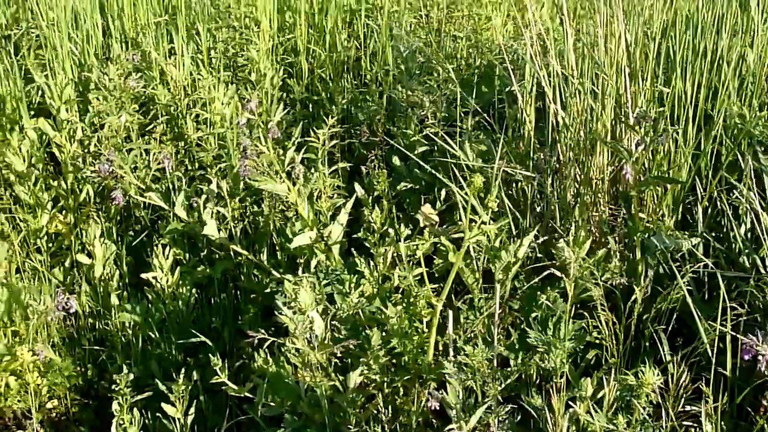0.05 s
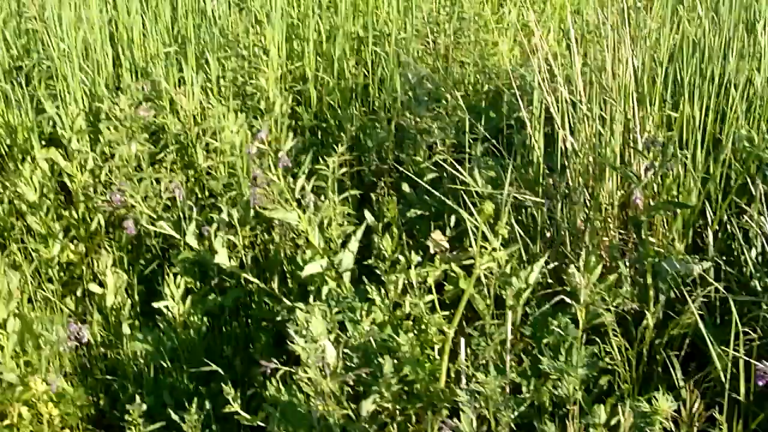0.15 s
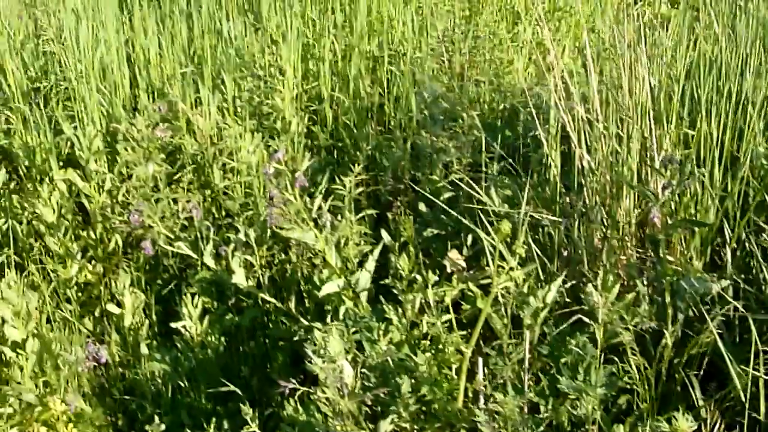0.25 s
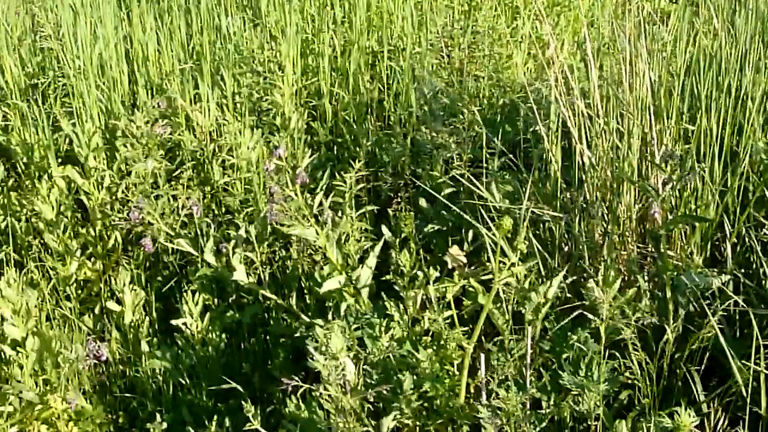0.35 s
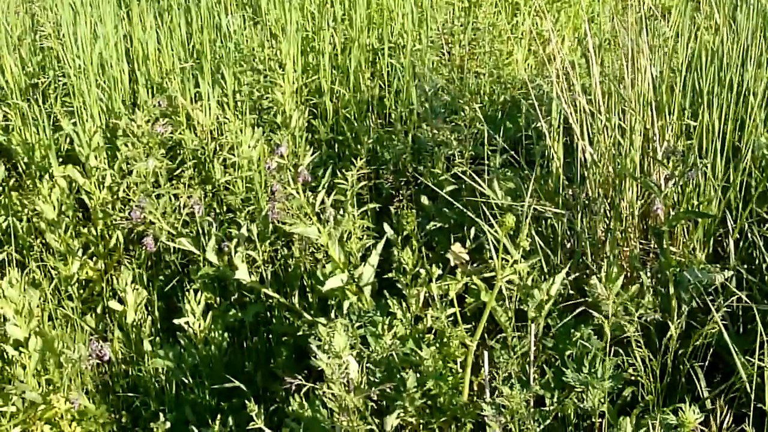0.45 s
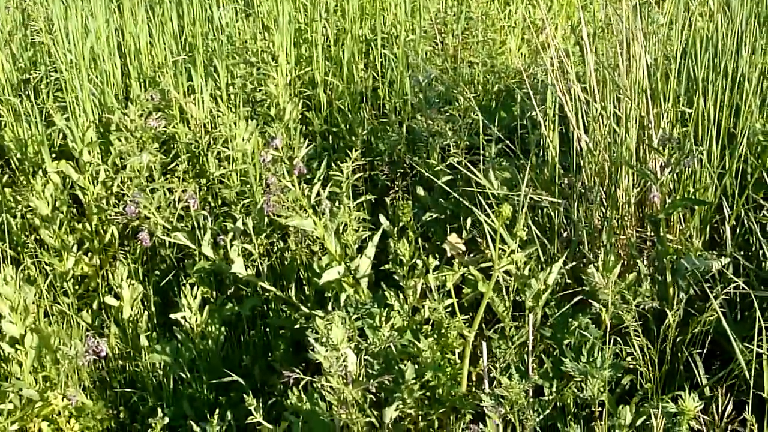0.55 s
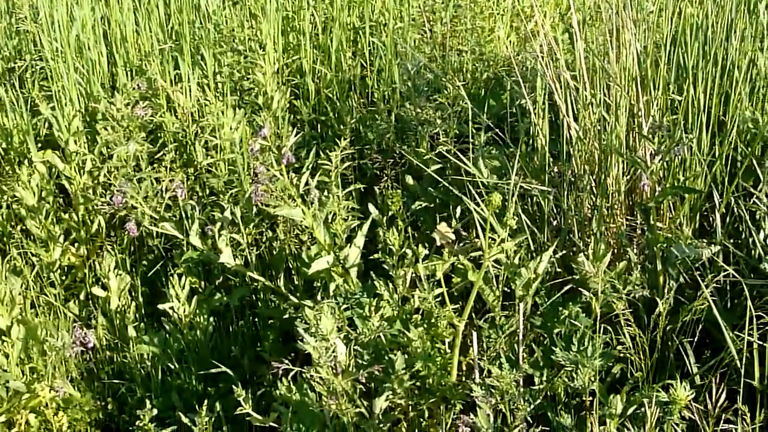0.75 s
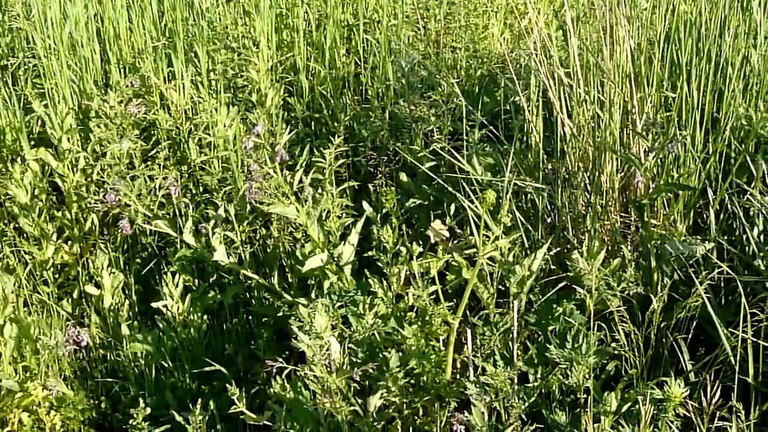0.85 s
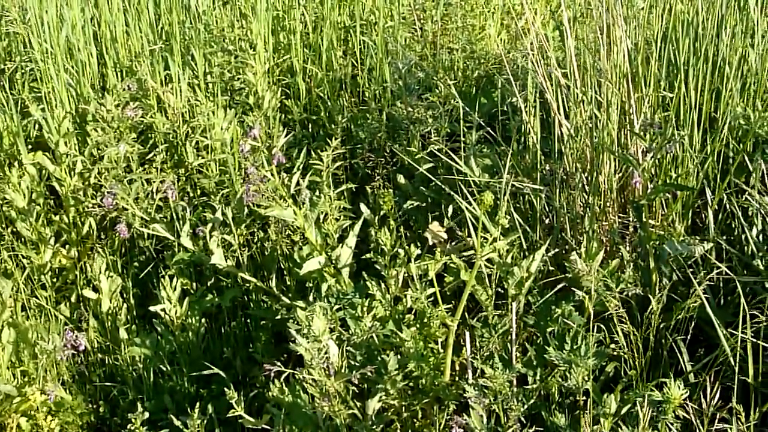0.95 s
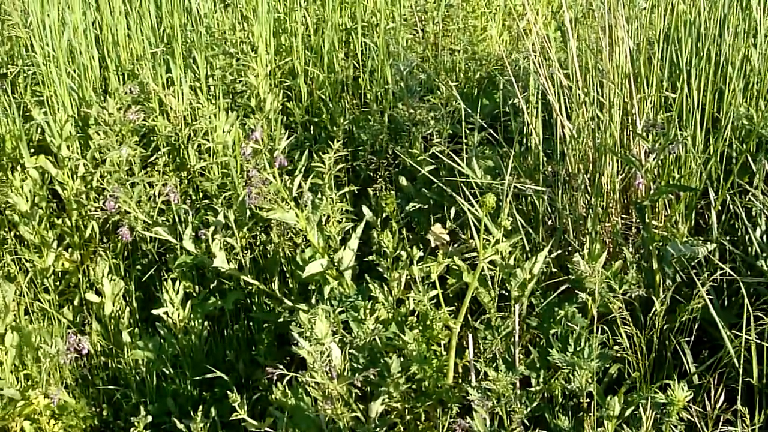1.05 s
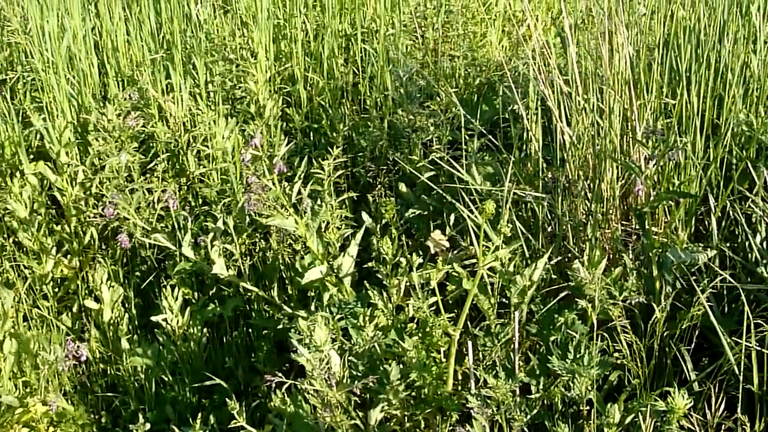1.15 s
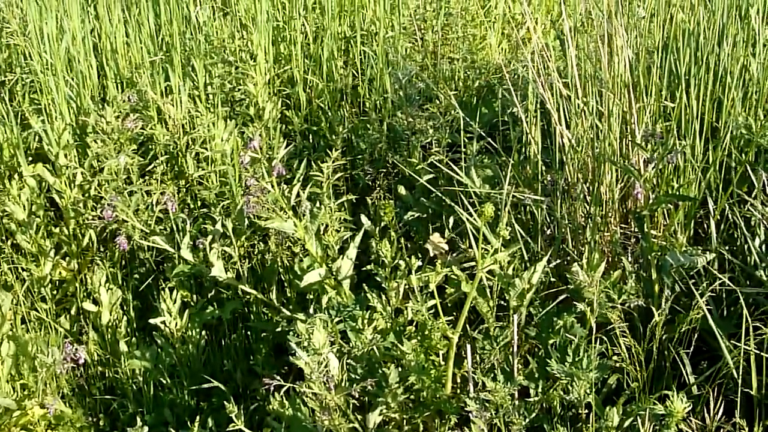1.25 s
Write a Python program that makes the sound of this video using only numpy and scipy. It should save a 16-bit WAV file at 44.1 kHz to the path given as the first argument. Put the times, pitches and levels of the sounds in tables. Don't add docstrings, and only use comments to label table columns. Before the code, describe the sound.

Two harsh, dry rasping calls from a bird hidden in tall grass, over faint outdoor rumble.

```python
import sys
import numpy as np
from scipy import signal
from scipy.io import wavfile

SR = 44100
rng = np.random.default_rng(int(sys.argv[2]) if len(sys.argv) > 2 else 0)


def volts(x):
    e = np.asarray(x, float) / 20
    return 10 ** e


def store_pcm(level_fs):
    pcm = np.round(np.clip(level_fs, -1, 1) * 32767).astype(np.int16)
    wavfile.write(sys.argv[1], SR, np.atleast_2d(pcm).T)


N = 57330


def rms_one(x):
    return x / np.sqrt(np.mean(x ** 2) + 1e-20)


def at(points, where, scale=np.asarray):
    a, b = np.transpose(points)
    return np.interp(scale(where), scale(a), b)


def resonate(x, hz, width_hz):
    r = np.exp(-np.pi * width_hz / SR)
    b = (1 - r * r) / 2 * np.array([1, 0, -1])
    a = [1, -2 * r * np.cos(2 * np.pi * hz / SR), r * r]
    once = signal.lfilter(b, a, x + 1e-18)
    return signal.lfilter(b, a, once)


def stereo(mid, side, alike):
    alike = np.clip(alike, 0, 1)
    return np.sqrt(1 + alike) * mid + np.sqrt(1 - alike) * side * [[1], [-1]]


# start t/s, level/dB, fade begins after t/s, fade rate/(dB per s)
RASPS = [
    (.2335, -11, 0.13, 267),
    (.9496, -11, 0.13, 203),
]
ROUND_GAPS_S = [.0071, .0099, .00685, .0092, .0087]
ROUND_STRETCH = [1.02, 1.006, .975]
CLOSING_GAPS_S = [
    [.0082, .0082, .0083, .0077, .0102, .0071, .009, .0078, .0073],
    [.0085, .0101, .0107, .0091],
]
TEMPO_STRETCH = [1, 1.024]


def snaps(n):
    start_s, db, fade_s, fade_db_per_s = RASPS[n]
    rounds = np.outer(ROUND_STRETCH, ROUND_GAPS_S).ravel()
    opening = np.r_[0, 0.006, rounds] * TEMPO_STRETCH[n]
    s = np.cumsum(np.r_[opening, CLOSING_GAPS_S[n]])
    level = db - fade_db_per_s * np.maximum(s - fade_s, 0)
    level[0] += -3.5
    level[-1] += (-8, -22)[n]
    beak = -4.5 * (s / 0.072 - 1) ** 2
    beak[0] += -1
    return start_s, fade_s, s, level, beak


# f/Hz, width/Hz, level/dB in first rasp, level/dB in second,
# level/dB of second slip over first
THROAT = [(264, 330, -7.5, -7.5, -7), (837, 500, -4, -4, -15.5), (1620, 312, 8, 7, 1),
          (2350, 390, -18, -9, -2.5), (2729, 297, 6, 6.5, 4.5), (3296, 273, -0.5, -1, -16),
          (3820, 400, -4, -7, -4), (4496, 540, 3.5, -0.5, -6.5), (5430, 160, 6, 7, 10),
          (5967, 1460, 3.5, 3, 7), (7860, 270, -3, -3.5, 6)]


def throat(start_s, fade_s, s, level, beak, n):
    beak_hz = 4000
    chance = rng.standard_normal((len(s), 2))
    first = ((start_s + s) * SR).astype(int)
    second_slip_s = 0.00111 + 0.00004 * chance[:, 0]
    second = first + (second_slip_s * SR).astype(int)
    slack = np.clip((np.arange(N) / SR - start_s - fade_s) / 0.039 + 0.5, 0, 1)
    out = np.zeros(N)
    for hz, width, *ring_db, late_db in THROAT:
        in_beak = hz > beak_hz
        gain = level + ring_db[n] + beak * in_beak + 1.1 * rng.standard_normal(len(s))
        clicks = np.zeros(N)
        clicks[first] = -volts(gain + 20 - late_db / 2)
        clicks[second] = -volts(gain + 20 + late_db / 2 + 1.3 * chance[:, 1])
        polarity = (-1) ** in_beak
        clicks *= polarity / np.hypot(volts(late_db / 2), volts(-late_db / 2))
        sunk = slack * (hz < beak_hz)
        sunk_hz = hz * (1 - 0.079 * (hz < 2000))
        out += resonate(clicks * (1 - sunk), hz, width)
        out += resonate(clicks * sunk, sunk_hz, 1.36 * width)
    return out


# f/Hz, width/Hz, level/dB
PUFF = [(2380, 360, -19.5), (3740, 820, -22.5), (9850, 1030, -39), (10170, 930, -34.5), (11500, 390, -34),
        (13000, 2600, -40.5)]


def puffs(impulses):
    peak_s = 0.0022
    r = np.exp(-1 / (peak_s * SR))
    swell = signal.lfilter([np.e * (1 - r)], [1, -2 * r, r * r], impulses + 1e-18)
    breath = swell * rng.standard_normal(N)
    return sum(volts(db + 13) * resonate(breath, hz, width) for hz, width, db in PUFF)


# f/Hz, width/Hz
HOLLOWS = [(1290, 117), (5000, 150), (8900, 480)]


def bird():
    out, impulses = np.zeros(N), np.zeros(N)
    for n in range(len(RASPS)):
        start_s, fade_s, s, level, beak = snaps(n)
        impulses[((start_s + s) * SR).astype(int)] = volts(level + beak)
        out += throat(start_s, fade_s, s, level, beak, n)
    out += puffs(impulses)
    for hz, width in HOLLOWS:
        out = signal.lfilter(*signal.iirnotch(hz, hz / width, SR), out)
    lag = int(0.0036 * SR)
    bounce = np.r_[np.zeros(lag), out[:-lag]]
    return out + volts(1) * resonate(bounce, 5500, 790)


# f/Hz, level/dB, t60/s
HAZE = [(1700, -15.5, 0.042), (2590, -10, 0.1), (4100, -8, 0.059), (5960, -13, 0.31), (8640, -8.5, 0.096)]


def grass(call):
    t, tail = np.arange(SR // 2) / SR, 0
    for hz, db, t60 in HAZE:
        noise = resonate(rng.standard_normal((2, len(t))), hz, hz / 2)
        noise = noise * volts(-60 * t / t60) * np.minimum(t / 0.003, 1)
        tail = tail + volts(db) * noise / np.sqrt(t60 * SR / 14)
    return signal.fftconvolve(call[None], stereo(*tail, 0.67), axes=1)[:, :N]


# t/s, level/dB, f/Hz
TICKS = [
    (0.102, -30.5, 5330),
    (.113, -34, 5760),
    (0.119, -30.5, 5700),
    (.766, -48, 7350),
    (0.803, -49, 6350),
    (0.842, -54, 7600),
]
# centre t/s, length/s, level/dB, f/Hz
BRUSHES = [
    (.11, 0.021, -40, 5900),
    (0.64, 0.032, -46, 2670),
    (0.033, 0.036, -45.5, 4800),
]


def ticks_and_brushes():
    t, out = np.arange(N) / SR, 0
    ticks = [(s, 0.0015, db, hz, 1400) for s, db, hz in TICKS]
    brushes = [(s, length, db, hz, hz) for s, length, db, hz in BRUSHES]
    for s, length, db, hz, width in ticks + brushes:
        noise = rms_one(resonate(rng.standard_normal((2, N)), hz, width))
        swell = np.exp(-0.5 * ((t - s) / length) ** 2)
        out = out + volts(db - 10.5) * swell * stereo(*noise, 0.85)
    return out


def drift(rate_hz):
    r = np.exp(-80 * np.pi * rate_hz / SR)
    noise = rng.standard_normal(N // 40 + 2002)
    slow = signal.lfilter([1], [1, -2 * r, r * r], noise)[2000:]
    return np.interp(np.arange(N) / 40, np.arange(len(slow)), rms_one(slow))


# f/Hz, likeness [0..1] (values below 0 count as 0)
LIKENESS = [(60, 1), (180, 0.9), (550, 0.46), (1650, -0.21), (4970, -0.02), (15000, -0.11)]


def banded_noise(spectrum, patchy_db):
    out, together = 0, drift(2.26)
    low, high = spectrum[0][0], min(spectrum[-1][0] * 1.15, 0.45 * SR)
    edges = np.geomspace(low, high, int(2.5 * np.log2(high / low)))
    white = rng.standard_normal((2, 2, N))
    for k, (a, b) in enumerate(zip(edges, edges[1:])):
        band = signal.butter(2, [a, b], "band", fs=SR, output="sos")
        mid, side = signal.sosfilt(band, white[k % 2])
        hz = np.sqrt(a * b)
        flicker = patchy_db * (together / 2 + drift(18.3))
        gain = volts(at(spectrum, hz, np.log) + flicker)
        out = out + gain * stereo(mid, side, at(LIKENESS, hz, np.log))
    return rms_one(out)


# t/s, level/dB
LEAVES_LEVEL = [(0.0, -62.5), (0.27, -60.5), (0.462, -63.5), (0.688, -65.5), (1.3, -64)]
# f/Hz, level/(dB per Hz)
LEAVES = [(710, -30), (1200, 3), (1570, -30), (2290, -20), (2610, 0), (3760, 5), (5550, 1.5),
          (15800, -10.5)]
# t/s, level/dB
RUMBLE_LEVEL = [(0, -42), (.3, -43.5), (.6, -45.5), (1.0, -44), (1.3, -45)]
# f/Hz, level/(dB per Hz)
RUMBLE = [(15, -53), (25, -19.5), (71, 1.5), (153, -3.5), (204, -11), (433, -10), (757, -11), (818, -12.5),
          (2500, -20.5), (3250, -27), (5500, -120)]


def meadow():
    t = np.arange(N) / SR
    leaves = volts(at(LEAVES_LEVEL, t) + 11) * banded_noise(LEAVES, patchy_db=1.8)
    hum = volts(-53.5 + 45.5) * rms_one(resonate(rng.standard_normal(N), 151.1, 16.6))
    rumble = banded_noise(RUMBLE, patchy_db=2.0)
    return leaves + volts(at(RUMBLE_LEVEL, t)) * (rumble + hum)


def scene():
    call = bird()
    return call + grass(call) + ticks_and_brushes() + meadow()


def top_cut(x):
    return signal.sosfilt(signal.butter(12, 16140, fs=SR, output="sos"), x)


def record(dry):
    low_pass = signal.cheby2(12, 70, 16400, fs=SR, output="sos")
    mix = signal.sosfilt(low_pass, dry)
    return top_cut(mix)


dry = scene()
out = record(dry)
store_pcm(out)
```